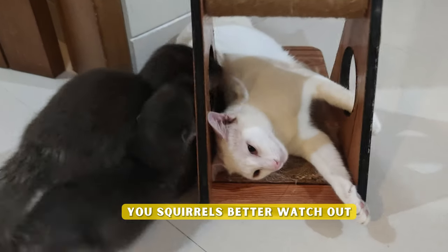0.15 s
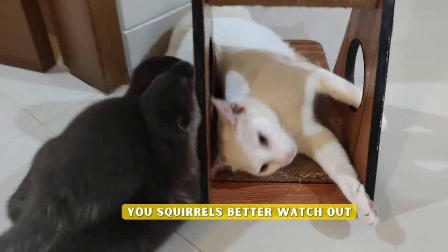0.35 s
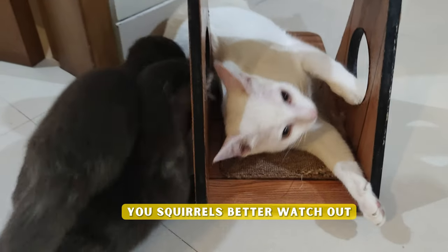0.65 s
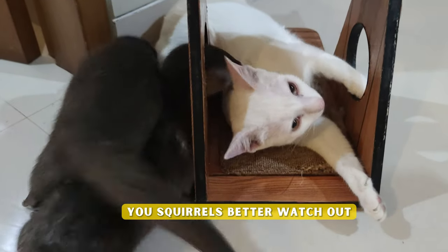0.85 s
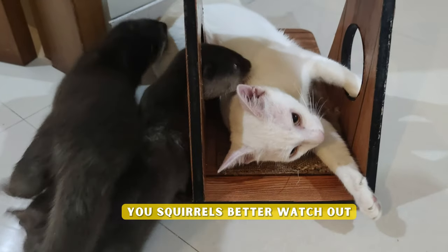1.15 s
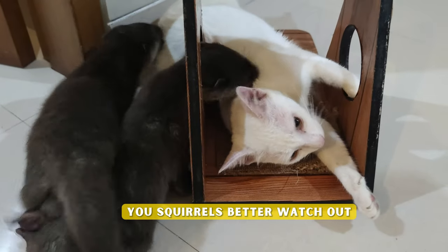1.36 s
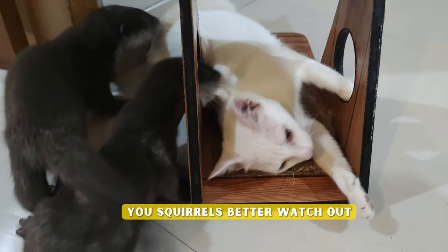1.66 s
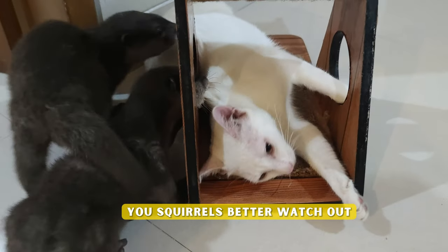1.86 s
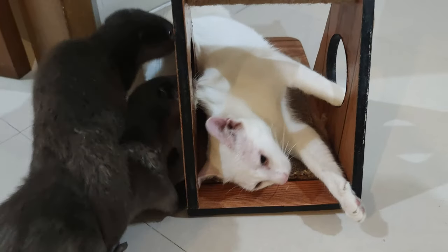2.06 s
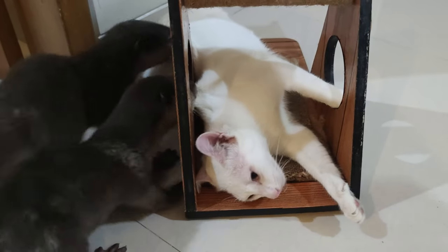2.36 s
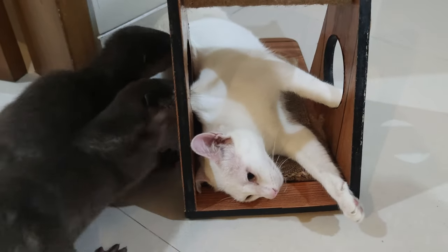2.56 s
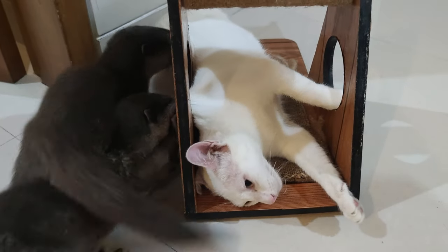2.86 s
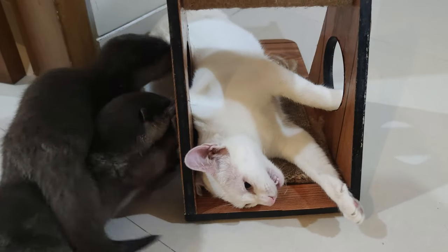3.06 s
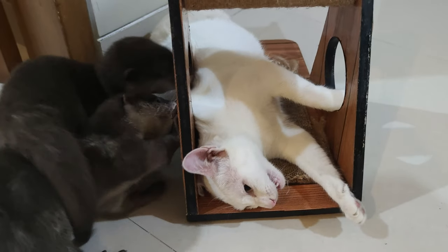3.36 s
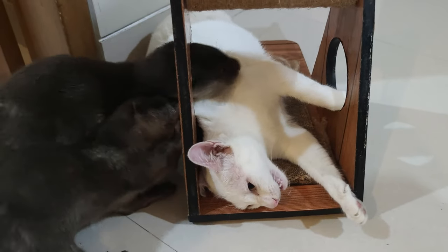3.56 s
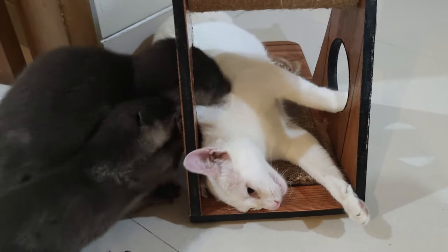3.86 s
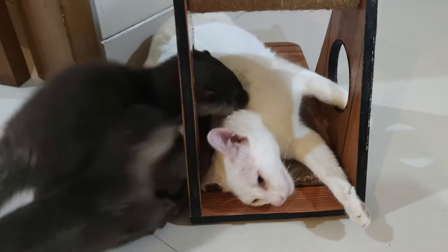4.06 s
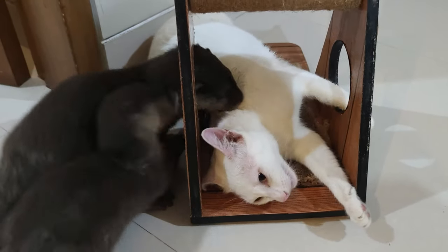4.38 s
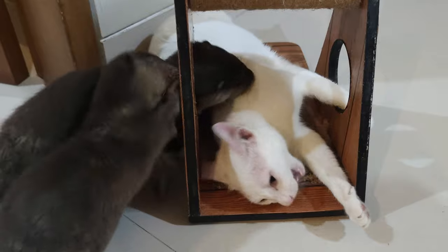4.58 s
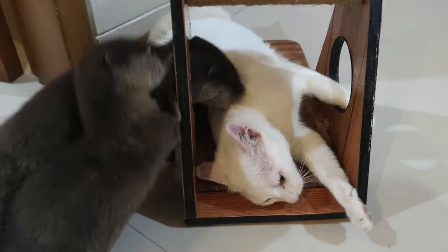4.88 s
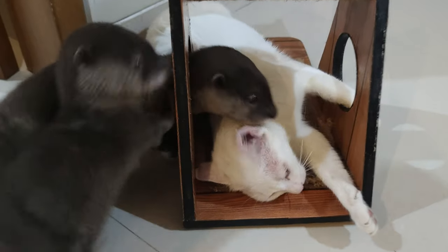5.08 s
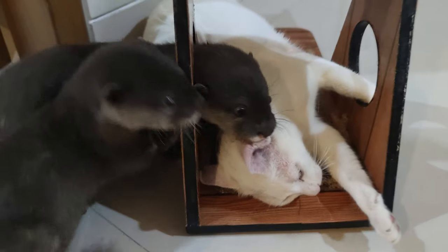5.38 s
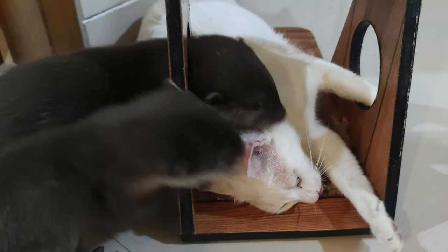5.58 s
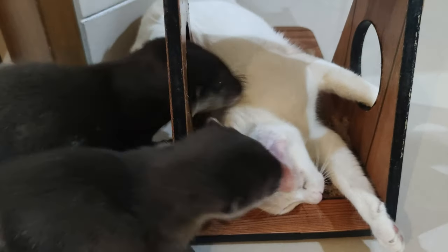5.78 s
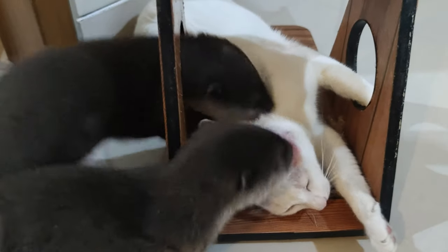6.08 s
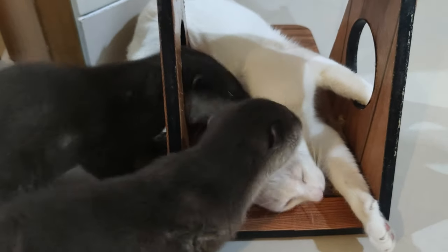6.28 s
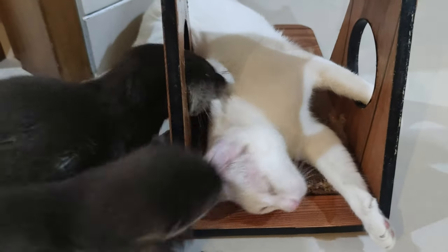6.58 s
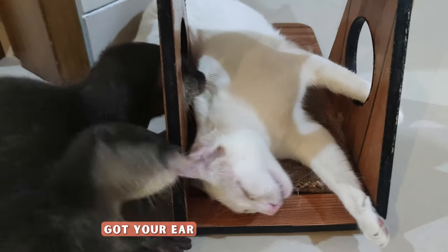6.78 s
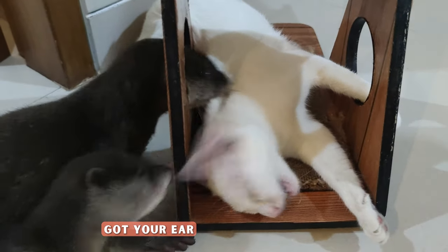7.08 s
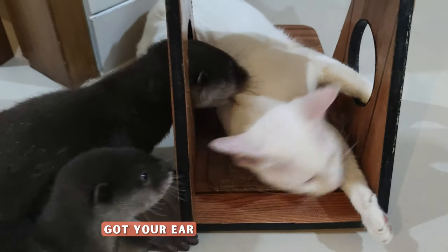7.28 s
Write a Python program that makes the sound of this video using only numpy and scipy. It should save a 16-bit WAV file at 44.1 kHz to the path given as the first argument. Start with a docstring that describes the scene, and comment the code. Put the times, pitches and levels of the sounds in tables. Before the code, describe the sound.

Thin, piercing otter chirps, each only a blink long, drop in pitch and leave a short tiled-room ring. Between them are faint claw ticks, fur brushing and soft nudges against a wooden stool. A breathy two-toned squeal pushes several times after the first second; a sharp rasp follows. Later chirps are louder, then the cat twists free with hissing, knocks and scuffing. Low room murmur and a faint fluttering insect whine continue behind, heard by a close stereo phone.

```python
"""Two pet otters crowd round a cat on a wooden stool in a tiled room, close to a phone.
Their short falling chirps are gliding whistles with overtones; a hoarse squeal is two whistles in air,
and rasping hisses are fluttering noise in a throat. Shaped noise rubs and brushes like fur and ticks
like claws; bumps and a scuffle ring the wooden stool.
A far insect's band of noise throbs high over the murmur of the room."""
import sys
import numpy as np
from scipy import signal
from scipy.fft import rfft, irfft
from scipy.io import wavfile
from scipy.ndimage import uniform_filter1d

SR = 44100
rng = np.random.default_rng(int(sys.argv[2]) if len(sys.argv) > 2 else 0)


def generate_wav(signal):
    """Clip the signal to [-1, 1] and save it as 16-bit WAV at the path in sys.argv[1]."""
    frames = np.transpose(np.atleast_2d(signal))
    scaled = np.clip(frames, -1, 1) * 32767
    pcm = np.round(scaled).astype(np.int16)
    wavfile.write(sys.argv[1], SR, pcm)


N = 328104
T = np.arange(N) / SR

# Otter chirps: (time [s], length [s], start pitch [Hz], end pitch [Hz], upward arch [Hz], level [dB],
# swell from start to end [dB], left minus right [dB], relative overtones [dB],
# relative sound sent into the room [dB], relative mouth snap [dB])
CHIRPS = [(0.002, 0.021, 6700, 3680, 106, -41.5, -3, -5, 0, -9.5, -55),
          (0.159, 0.07, 6220, 5480, 650, -44.5, 1, -10, -15, -7, -75),
          (1.31, 0.055, 6450, 4890, 925.5, -36.5, 16, -35, -15, -7, -70),
          (2.168, 0.032, 6030, 5180, 293, -45.5, -3, -22, -2, 0, -48),
          (2.398, 0.05, 6220, 4100, 336, -39.5, 13, -6, -12, 2.5, -40.5),
          (2.857, 0.039, 6180, 4880, 152, -40, 3, -21, -12.5, -1.5, -60),
          (3.921, 0.045, 6680, 3610, 352, -37, 12.5, -8, -9, -4.5, -47),
          (4.289, 0.061, 6410, 3510, 1400, -39, -10, -7, -5, -12, -52),
          (4.599, 0.036, 5990, 4430, 121, -35, 1.5, -34, -20, -6.5, -42),
          (4.941, 0.038, 5860, 3150, -130, -35.5, 6.5, -6.5, -8, -1.5, -43.5),
          (5.819, 0.046, 6440, 3930, 60, -30.5, 12, -12, -11.5, -10, -43),
          (6.142, 0.058, 6120, 4050, 644, -30.5, 12.5, -13.5, -17.5, -11.5, -50.5),
          (6.636, 0.041, 6680, 3450, -50, -31.5, 17, -7.5, -9, -7.5, -37)]


def undb(db):
    """Decibels to gain."""
    return 10 ** (np.asarray(db) / 20)


def unit(x):
    """Scale to an rms strength of 1."""
    return x / np.sqrt(np.mean(x ** 2))


def add(track, s, x):
    """Lay a sound into a track at time s."""
    i = max(int(s * SR), 0)
    track[..., i:i + x.shape[-1]] += x[..., :N - i]


def pan(x, db):
    """Place a sound by its left minus right level."""
    gains = undb(np.array([[db], [-db]]) / 2)
    return x * unit(gains)


def band(x, hz, width_hz):
    """A resonance lets through the sound near one pitch, with gain 1 at its centre."""
    centre_hz = min(hz, .45 * SR)
    sharpness = hz / min(width_hz, .4 * SR)
    return signal.lfilter(*signal.iirpeak(centre_hz, sharpness, fs=SR), x)


def along(points):
    """Read a (Hz, value) table at every frequency bin, on a logarithmic pitch scale."""
    hz, value = np.transpose(points)
    bins_hz = np.arange(N // 2 + 1) * SR / N
    return np.interp(np.log(bins_hz + 1), np.log(hz), value)  # +1 avoids log(0)


def colour(x, points):
    """Shape a sound's spectrum with a (Hz, dB) table."""
    return irfft(rfft(x) * undb(along(points)), N)


def walk(rate):
    """Smooth chance with rms 1, heading for a new random value this many times a second."""
    k = max(int(SR / rate), 1)
    steps = np.repeat(rng.standard_normal(N // k + 1), k)[:N]
    return unit(uniform_filter1d(steps, k))


def envelope(s, rise_s, hold_s, fall_s):
    """A straight rise from time s, a hold, then a dying away."""
    rise = np.clip((T - s) / rise_s, 0, 1)
    return rise * np.exp(-np.maximum(T - s - rise_s - hold_s, 0) / fall_s)


def together(envelopes):
    """The strength of unrelated sounds that overlap: their powers add."""
    return np.sqrt(sum(e ** 2 for e in envelopes))


def strikes(table, decay_s):
    """Short dying bursts of noise, one for each (time, dB) row."""
    out, t = np.zeros(N), T[:SR // 8]
    for s, db in table:
        burst = np.exp(-t / decay_s) * rng.standard_normal(len(t))
        add(out, s, undb(db) * burst)
    return out


def pair():
    """Noise at two microphones, as alike at each pitch as the likeness table says."""
    # How alike the two microphones are: (frequency [Hz], correlation of left and right)
    likeness_points = [(30, 0.64), (70, 0), (140, 0.78), (300, 0.78), (700, 0.18), (1400, 0)]
    likeness = np.clip(along(likeness_points), -1, 1)
    mid, side = rfft(rng.standard_normal((2, N)))
    shared = mid * np.sqrt(1 + likeness)
    opposed = np.array([[1], [-1]]) * side * np.sqrt(1 - likeness)
    return irfft(shared + opposed, N)


def rubbing(grain_db=3, db=1):
    """Fur and paws catch and slip on wood and floor: light fidgeting, shoves, and a jerk after each chirp."""
    # Shoves along wood and floor: (time [s], hold [s], level before the overall gain db [dB])
    shove_rows = [(1.116, 0.13, -56.5), (1.457, 0.78, -60), (2.275, 0.26, -57), (3.106, 0.34, -59),
                  (3.99, 0.26, -60), (4.328, .01, -59), (4.99, 0.18, -58.5), (5.696, 0.024, -53),
                  (7.096, 0.32, -54.5)]
    # Tone of the rubbing: (frequency [Hz], relative level [dB])
    rub_colour = [(90, -14), (220, -0.5), (400, -2.5), (600, -6), (950, -1), (1400, -15.5), (1800, -10),
                  (2500, -9.5), (5000, -19.5), (9000, -24), (15000, -21.5)]
    restless_s = 1.1  # the otters grow restless from this time
    calm_db, fidget_db = -69.5, -61  # before and after it, ahead of the overall gain
    fidget = undb(np.where(T < restless_s, calm_db, fidget_db))
    shoves = [undb(level_db) * envelope(s, rise_s=0.019, hold_s=hold_s, fall_s=0.057)
              for s, hold_s, level_db in shove_rows]
    # the body jerks at the end of every chirp
    jerks = [undb(-57.5) * envelope(s + length, rise_s=.012, hold_s=0, fall_s=0.014)
             for s, length, *_ in CHIRPS]
    slips = pair() * undb(grain_db * walk(400) + 1.32 * walk(30))
    effort = together([fidget, *shoves, *jerks])
    return unit(colour(slips, rub_colour)) * effort * undb(db)


def insect(throb_db=3, db=-56.0, whine_hz=7460, whine_db=-10):
    """A far insect's high buzz around a thin whine, smeared by distance, swells nearly ten times a second."""
    # The insect's band: (frequency [Hz], relative level [dB])
    buzz_colour = [(5500, -36), (6500, -33.5), (6950, -10), (7250, -7.5), (7460, -2), (7650, -7.5),
                   (7850, -50), (8300, -64)]
    throb = np.cos(2 * np.pi * 9.574 * (T - .035))
    whine = unit(band(band(rng.standard_normal((2, N)), whine_hz, 90), whine_hz, 90))
    broad = unit(colour(rng.standard_normal((2, N)), buzz_colour))
    buzz = unit(broad + undb(whine_db) * whine)
    return pan(buzz * undb(db + throb_db * throb + .8 * walk(2)), -2)


def murmur(air_db=-59.5, hiss_db=-66.5, hum_db=-74):
    """Gently swaying air noise with a low drone of narrow noise, and the fine hiss of the microphones."""
    # Tone of the room's air: (frequency [Hz], relative level [dB])
    air_colour = [(12, -42), (20, 8), (132, -6.5), (163, -12), (198, 0), (245, -13.5), (290, -5),
                  (467, -11), (565, -8), (828, -14.5), (3080, -22), (4840, -34), (6000, -38), (7800, -38),
                  (13200, -120)]
    # Tone of the microphone hiss: (frequency [Hz], relative level [dB])
    hiss_colour = [(1000, 8), (6000, -17), (11000, 5), (13500, -1), (15500, 1)]
    sway = undb(.8 * walk(6))
    air = unit(colour(pair() * sway, air_colour))
    stir = rng.standard_normal(N)
    low_drone = band(band(stir, 252, 35), 199, 60)
    high_drone = band(band(stir, 283, 22), 316, 35)
    drone = unit(low_drone + undb(-3.5) * high_drone)
    hiss = unit(colour(rng.standard_normal((2, N)), hiss_colour))
    return undb(air_db) * air + undb(hum_db) * drone + undb(hiss_db) * hiss


def chirps(jitter=0.0029, shimmer_db=2.5, onset_s=0.002, close_s=0.0025, third_db=-22):
    """A thin whistle bends, then plunges as the mouth closes; gives the sound ahead and that sent to the room."""
    plunge_share, plunge_power = .45, 10.8  # share of the fall in the last plunge; the rest slides evenly
    crest_db, harden_db = 3, 4  # the middle stands above the ends; overtones grow as the mouth closes
    ahead_db, room_overtone_db = -1, 1.5  # the otters face away: overtones come more by way of the room
    ahead, around = np.zeros((2, N)), np.zeros((2, N))
    waver, flutter = walk(900), walk(500)
    for s, length, start_hz, end_hz, arch_hz, level_db, swell_db, pan_db, overtone_db, room_db, _ in CHIRPS:
        n, i = int(length * SR), max(int(s * SR), 0)
        u = np.linspace(0, 1, n)  # progress through the chirp
        arch = 1 - (2 * u - 1) ** 2
        fall = (1 - plunge_share) * u + plunge_share * u ** plunge_power
        hz = start_hz + (end_hz - start_hz) * fall + arch_hz * arch
        phase = 2 * np.pi * np.cumsum(hz * (1 + jitter * waver[i:i + n])) / SR
        db = level_db + swell_db * (u - .5) + crest_db * (arch - 1)
        gate = np.clip(u * length / onset_s, 0, 1) * np.clip((1 - u) * length / close_s, 0, 1)
        effort = gate * undb(db + shimmer_db * flutter[i:i + n])
        # the third harmonic sounds only where it fits below half the sample rate
        third = undb(third_db) * (3 * hz < SR / 2) * np.sin(3 * phase)
        hardness = undb(overtone_db + harden_db * (u - 1.5))
        overtones = hardness * (np.sin(2 * phase) + third)
        beamed = np.sin(phase) + overtones * undb(ahead_db)
        spread = np.sin(phase) + overtones * undb(room_overtone_db)
        add(ahead, s, pan(beamed * effort, pan_db))
        add(around, s, pan(spread * effort * undb(room_db), -3))
    return ahead, around


def bumps(db=-5, contact_s=0.00432):
    """Soft bodies push the stool, which answers with its low modes."""
    # Bodies bump the stool: (time [s], level before the overall gain db [dB])
    bump_rows = [(0.023, -64), (1.218, -50), (3.309, -52), (4.029, -56), (4.207, -55), (6.995, -44.5),
                 (7.147, -40.5), (7.18, -37.5), (7.311, -39.5), (7.399, -38.5)]
    # The stool rings, its pitches varying a little each time:
    # (middle pitch [Hz], time to fall 60 dB [s], relative level [dB])
    stool_modes = [(141, 0.07, -2), (198.6, 0.11, 7), (267, 0.037, 3.5), (556, 0.11, -3)]
    out, t = np.zeros(N), T[:SR // 3]
    for s, level_db in bump_rows:
        ring = np.zeros(len(t))
        for hz, t60, gain_db in stool_modes:
            mode_hz = hz * (1 + 0.083 * rng.standard_normal())
            ring += undb(gain_db - 60 * t / t60) * np.sin(2 * np.pi * mode_hz * t)
        soft_start = 1 - np.exp(-t / contact_s)
        add(out, s - contact_s, undb(level_db + db) * ring * soft_start)
    return pan(out, 0)


def snaps(db=6, ring_s=0.019):
    """A small wet puff rings the mouth as it shuts after each chirp."""
    lag_s = .003  # from the chirp's end to the snap
    rows = [(s + length + lag_s, snap_db) for s, length, *_, snap_db in CHIRPS]
    puff = strikes(rows, decay_s=ring_s)
    low = band(band(puff, 1490, 270), 1260, 2000)
    high = band(band(puff, 2400, 480), 3100, 1700)
    return pan(undb(db) * (low + undb(1.5) * high), -1)


def claws(db=4):
    """Dry ticks with hardly any ring: very short noise through broad resonances."""
    # Claws on wood and tile: (time [s], level before the filters and the gain db [dB])
    tick_rows = [(0.581, -34), (0.879, -42.5), (1.151, -33), (2.052, -33)]
    tick = strikes(tick_rows, decay_s=0.0013)
    low = band(band(tick, 1840, 1300), 1400, 1400)
    high = band(band(tick, 2300, 2100), 2500, 3000)
    return pan(undb(db) * (low + undb(-3.5) * high), -2.0)


def squeal(hollow_hz=1720, hollow_db=-13):
    """Two unsteady whistles in a tight throat, each wrapped in driving air; the mouth rings below them."""
    # Pushes of the squeal: (time [s], rise [s], hold [s], lower whistle [dB], upper whistle [dB])
    pushes = [(0.99, .17, 0.082, -57, -52.5), (1.445, .025, 0.042, -46.5, -56),
              (1.576, 0.016, 0.036, -48, -51), (1.681, 0.065, 0.046, -47.5, -57),
              (1.796, .015, 0.076, -46, -63)]
    whistle_hz, sag_hz_per_s = (2436, 3590), (9.96, 98)  # lower and upper at the first push; how they sink
    wander, rough_db, air_db, fall_s = .005, 2.5, -9, .033
    efforts = together(undb(whistles_db)[:, None] * envelope(s, rise_s, hold_s, fall_s)
                       for s, rise_s, hold_s, *whistles_db in pushes)
    mouth = unit(band(band(rng.standard_normal(N), hollow_hz, 450), hollow_hz, 700))
    out = efforts[0] * undb(hollow_db) * mouth  # follows the lower whistle
    for first_hz, sag, effort in zip(whistle_hz, sag_hz_per_s, efforts):
        hz = first_hz - sag * (T - pushes[0][0])
        unsteady_hz = hz * (1 + wander * walk(45) + 3 * wander * walk(700))
        phase = 2 * np.pi * np.cumsum(unsteady_hz) / SR
        air = walk(600) * np.sin(phase) + walk(600) * np.cos(phase)  # noise close round the whistle
        whistle = unit(np.sin(phase) + undb(air_db) * air)
        out = out + whistle * effort * undb(rough_db * walk(100))
    return pan(out, -8)


def hisses(rasp_hz=127, rasp_db=5):
    """Air, chopped by a loose flutter, rushes through the throat resonances."""
    # Rasping hisses: (time [s], rise [s], hold [s], fall [s], level [dB])
    hiss_rows = [(1.02, 0.11, 0.1, 0.038, -52), (2.293, 0.0057, 0.018, 0.078, -37),
                 (3.1, 0.054, 0.17, .025, -56.5), (4.088, 0.014, 0.021, 0.04, -60),
                 (7.103, 0.0068, 0.027, 0.21, -49.5), (7.245, 0.032, 0.12, 0.022, -47)]
    # Throat resonances: (frequency [Hz], width before widening [Hz], relative level [dB])
    throat = [(1350, 120, -3), (2310, 275, 4.5), (2833, 450, 5), (3420, 570, -3.5), (4540, 1600, -20)]
    effort = sum(undb(level_db) * envelope(*timing) for *timing, level_db in hiss_rows)
    flap = np.sin(2 * np.pi * np.cumsum(rasp_hz * (1 + 0.16 * walk(60))) / SR)
    air = rng.standard_normal(N) * undb(rasp_db * flap + 2 * walk(60))
    voice = np.zeros(N)
    for k, (hz, width_hz, gain_db) in enumerate(throat):
        wide_hz = 1.2 * width_hz
        resonance = band(band(air, hz, wide_hz), hz, wide_hz)
        voice += (-1) ** k * undb(gain_db) * resonance  # neighbours have opposite signs
    return pan(effort * unit(voice), -13)


def brushes(grain_db=3):
    """Hairs flick over an edge: a soft, bright swell of grainy noise."""
    # Fur brushes along the wood: (time [s], length [s], level [dB])
    brush_rows = [(1.478, 0.2, -55), (1.934, 0.15, -48.5), (3.19, 0.16, -53.5), (7.09, 0.12, -52),
                  (7.19, 0.24, -47)]
    # Tone of the brushing: (frequency [Hz], relative level [dB])
    brush_colour = [(500, -38), (1500, 1.5), (2600, 4), (4500, -1), (9000, -4.5), (12000, -17.5),
                    (16000, -17)]
    swell = sum(undb(db) * np.sin(np.pi * np.clip((T - s) / length, 0, 1)) for s, length, db in brush_rows)
    flicks = rng.standard_normal(N) * undb(grain_db * walk(500))
    return pan(swell * unit(colour(flicks, brush_colour)), -5)


def scuffle(slips_per_s=700):
    """Uneven slips of claws and fur ring the wooden panels."""
    # The cat twists free and scuffs the stool: (time [s], hold [s], level [dB])
    scuffs = [(7.225, .005, -43.5), (7.258, 0.033, -40.5), (7.325, 0.043, -46.5)]
    # Panels of the stool under a scuff: (frequency [Hz], width of the first filter [Hz], relative level [dB])
    panels = [(286, 200, 0), (578, 75, 3.5), (734, 160, 1), (947, 300, -2), (1260, 61, -8), (2163, 103, 5)]
    force = together(undb(level_db) * envelope(s, rise_s=0.0093, hold_s=hold_s, fall_s=0.033)
                     for s, hold_s, level_db in scuffs)
    slips = (rng.random(N) < slips_per_s / SR) * rng.standard_normal(N)
    wood = sum(undb(gain_db) * band(band(slips, hz, width_hz), hz, 4 * width_hz)
               for hz, width_hz, gain_db in panels)
    return pan(unit(wood) * force, 1.6)


def reflections(x, db, decay_s, echo_db):
    """Floor and stool scatter the sound at once and a wall answers; the left microphone is reached first."""
    t = T[:SR // 12]
    sparse = rng.standard_normal((2, len(t))) * (rng.random((2, len(t))) < .05)
    scatter = sparse * np.exp(-t / decay_s) * (t > .002)
    response = undb(db) * scatter / np.sqrt(np.sum(scatter ** 2, axis=1, keepdims=True))
    response[:, int(.0079 * SR)] += undb(echo_db)  # the wall
    response[0, 0] = response[1, 11] = 1  # direct sound, 11 samples later on the right
    return signal.fftconvolve(x, response, axes=1)[:, :N]


def reverb(x, db, t60_s):
    """The tiled room rings on as dying noise, different at each microphone."""
    t = T[:SR]
    fade_in = np.clip((t - .004) / 0.002, 0, 1)
    tail = rng.standard_normal((2, SR)) * undb(-60 * t / t60_s) * fade_in
    response = undb(db) * tail / np.sqrt(np.sum(tail[0] ** 2))
    return signal.fftconvolve(x, response, axes=1)[:, :N]


def scene():
    """Animals and stool in the room, over the insect and the air."""
    ahead, around = chirps()
    calls = reflections(ahead, db=-9, decay_s=.011, echo_db=-18)
    calls = calls + reverb(around, db=2, t60_s=0.61)
    rasps = squeal() + hisses() + snaps() + brushes()
    rasps_mono = rasps.mean(axis=0, keepdims=True)
    rasps = reflections(rasps, db=-7, decay_s=.012, echo_db=-6)
    rasps = rasps + reverb(rasps_mono, db=-5, t60_s=.55)
    knocks = claws() + bumps() + scuffle()
    knocks = knocks + reverb(knocks, db=-8.0, t60_s=0.1)
    return calls + rasps + knocks + rubbing() + insect() + murmur()


def record(dry):
    """The phone cuts the top: a low-pass filter removes the highest treble."""
    top_hz = 15750
    low_pass = signal.firwin(401, top_hz, fs=SR, window="blackman")
    return signal.fftconvolve(dry, low_pass[None], mode="same", axes=1)


dry = scene()
out = record(dry)
generate_wav(out)
```